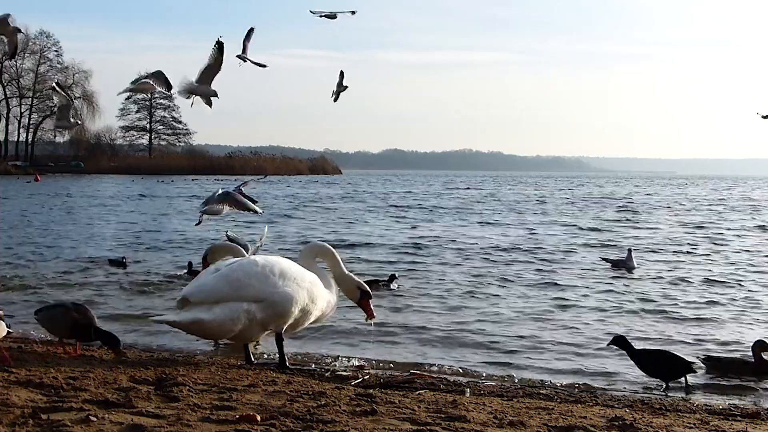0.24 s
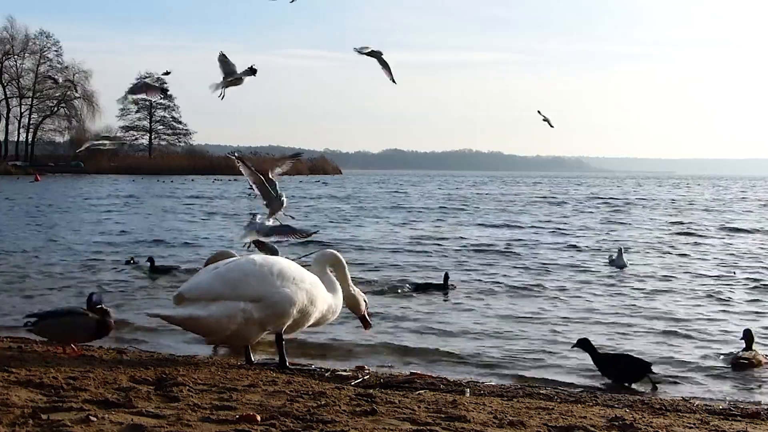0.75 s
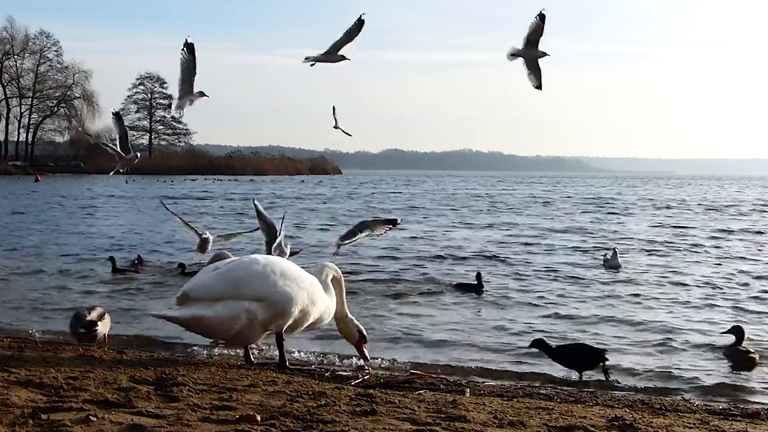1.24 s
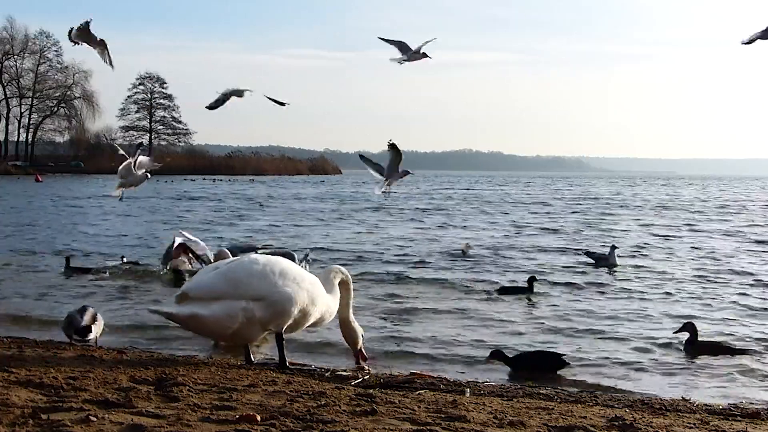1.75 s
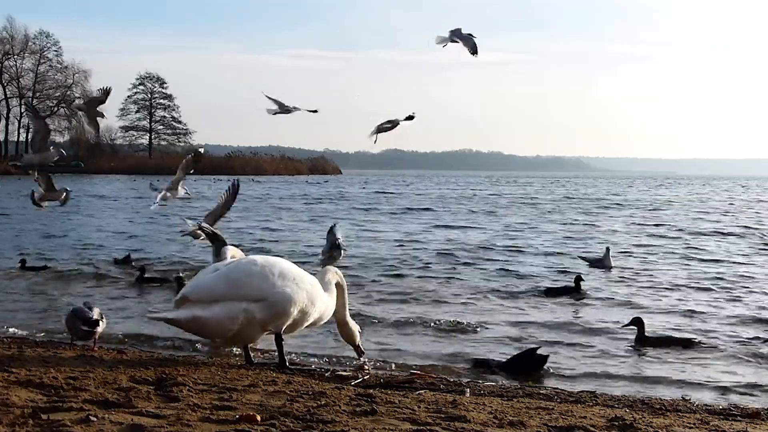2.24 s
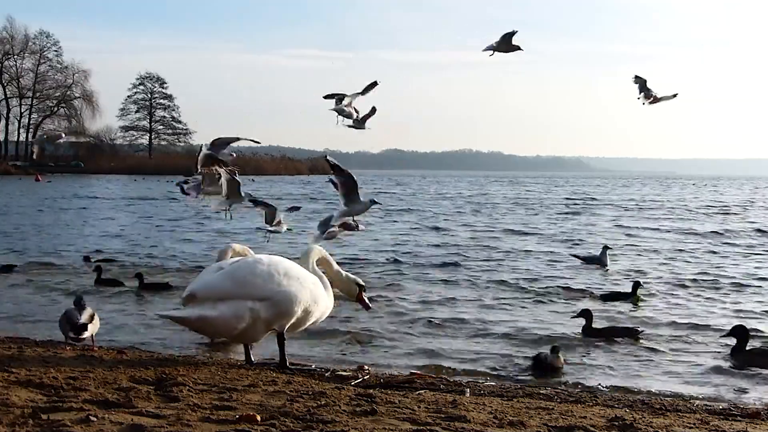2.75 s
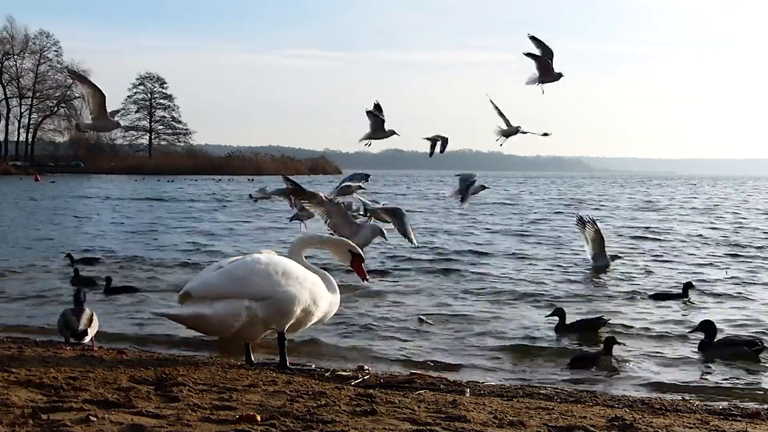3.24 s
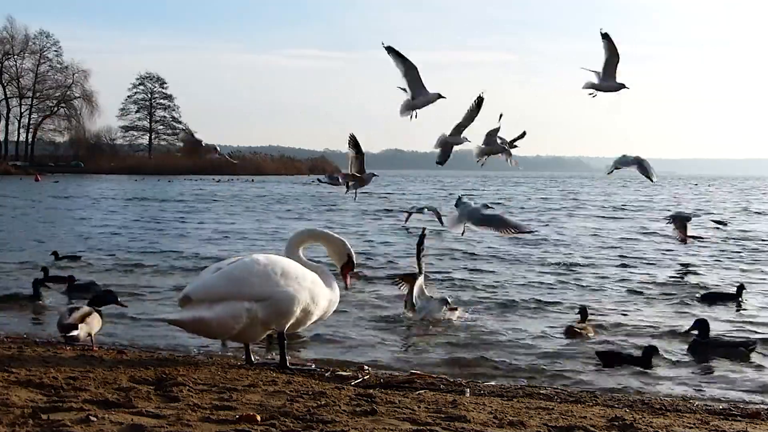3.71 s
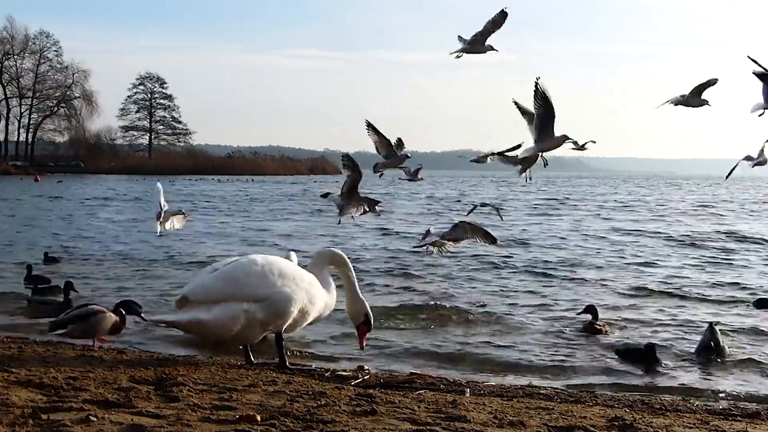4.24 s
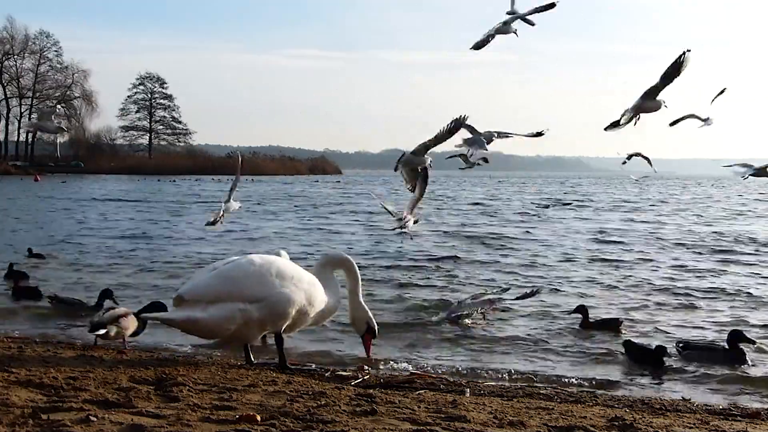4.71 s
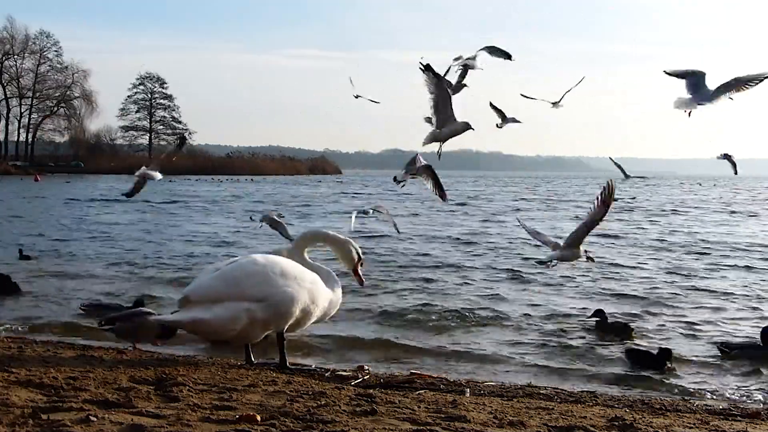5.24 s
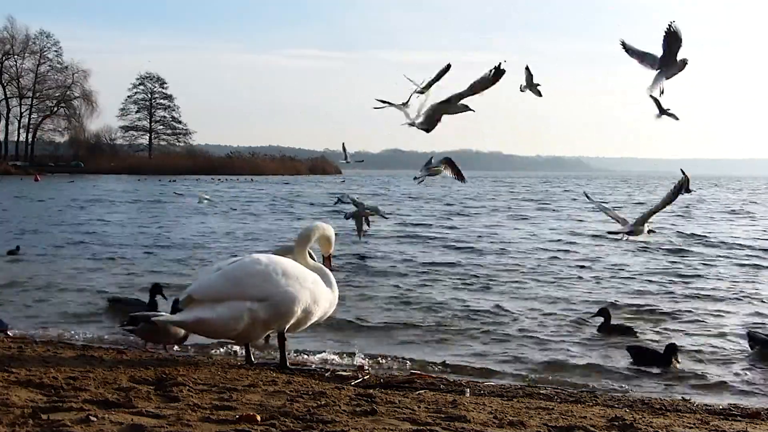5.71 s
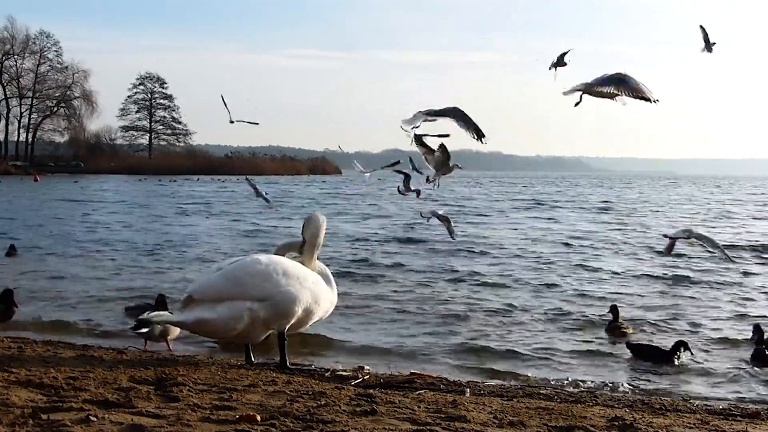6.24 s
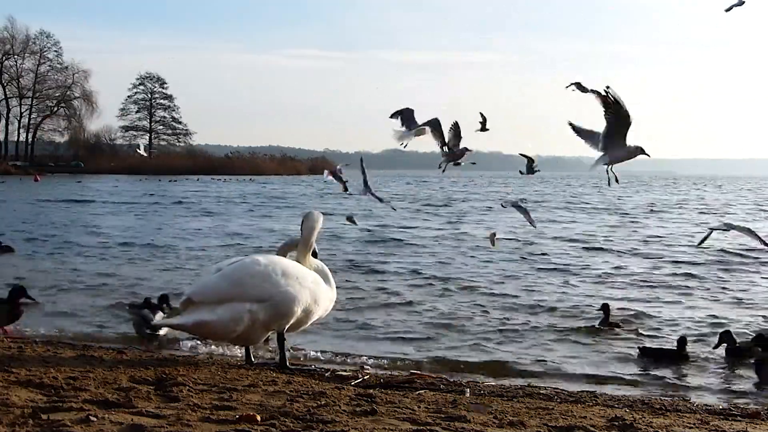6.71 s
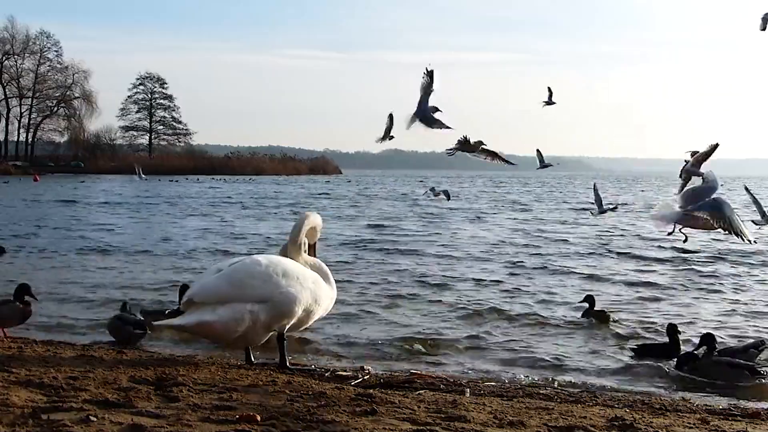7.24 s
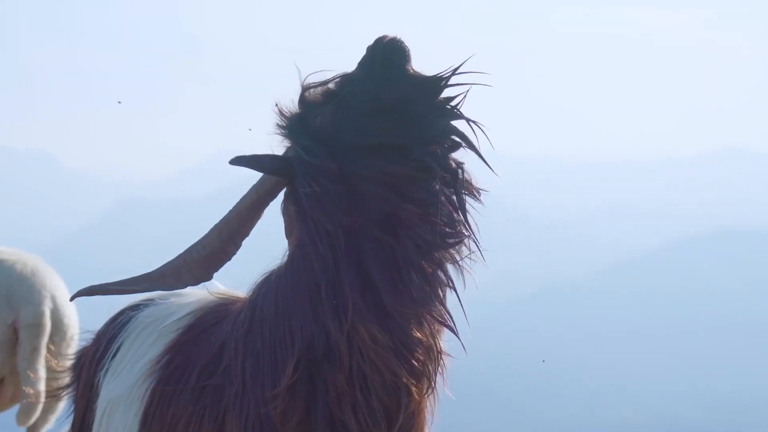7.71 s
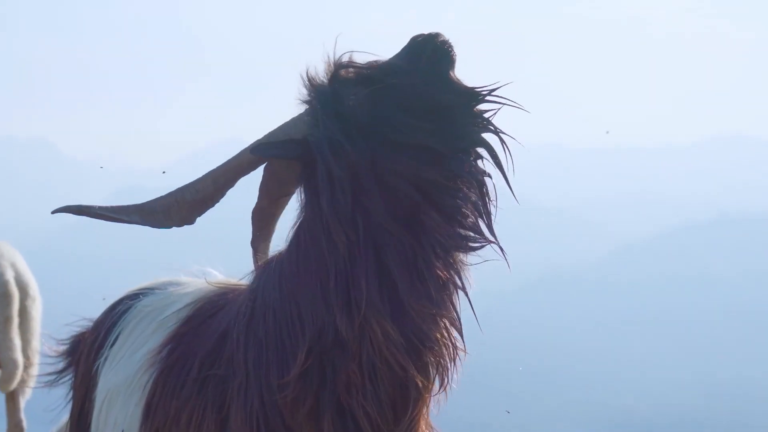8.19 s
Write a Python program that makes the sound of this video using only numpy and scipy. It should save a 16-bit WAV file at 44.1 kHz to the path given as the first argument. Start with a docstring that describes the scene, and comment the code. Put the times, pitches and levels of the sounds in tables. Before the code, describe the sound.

A flock of gulls squabbles in shrill overlapping yelps at a lakeshore, cuts off abruptly, then a goat gives one loud throbbing bleat.

```python
"""A water bird's pip, a sine, opens a lakeshore scene as a small wave of shaped noise runs up the sand.
Gulls squabble: shrill overlapping whistles, many breaking from a low register upward and snapping down
at the end, with partials added and a rasp of noise around them. The birds stop abruptly, then a goat gives
one loud bleat, a harmonic series over husky noise that throbs eleven times a second.
A faint rumble underlies the birds; a lopsided microphone distorts everything slightly."""
import sys
import numpy as np
from scipy import signal
from scipy.fft import rfft, irfft, next_fast_len
from scipy.io import wavfile
from scipy.ndimage import uniform_filter1d, minimum_filter1d, map_coordinates

SR = 44100
rng = np.random.default_rng(int(sys.argv[2]) if len(sys.argv) > 2 else 0)


def waveform_to_disk(signal):
    """Save audio, clipped to [-1, 1], as 16-bit WAV at the path in sys.argv[1]."""
    frames = np.transpose(np.atleast_2d(signal))
    scaled = np.clip(frames, -1, 1) * 32767
    samples = np.round(scaled).astype(np.int16)
    wavfile.write(sys.argv[1], SR, samples)


N = 373130
TIME = np.arange(N) / SR  # s
PIP_START, PIP_END, GULLS_END = .153, .182, 7.337  # s


def amp(db):
    """The logarithmic level scale: decibels to amplitude gain."""
    return 10 ** (np.asarray(db) / 20)


def unit(x):
    """Power normalisation: scale to rms 1."""
    return x / np.sqrt(np.mean(x ** 2) + 1e-20)


def along(points, hz):
    """Interpolate (frequency [Hz], value) points on a logarithmic frequency axis."""
    f, v = np.transpose(points)
    return np.interp(np.log(hz + 1), np.log(f + 1), v)


def curves(rows, t):
    """Piecewise-linear envelopes: each column after the first, read at the times t."""
    s, *cols = np.transpose(rows)
    return [np.interp(t, np.sort(s), c) for c in cols]


def wobble(rate, t):
    """Slow random modulation: a smooth curve over the times t with `rate` knots a second."""
    knots = (t - t[0]) * rate
    size = int(knots[-1]) + 4
    grid = np.arange(0, size, .2)
    smooth = map_coordinates(rng.standard_normal(size), [grid])
    return np.interp(knots, grid, smooth)


def gate(t, start, end, edge):
    """A trapezoidal envelope: 1 between start and end, with sloping edges."""
    return np.clip(np.minimum(t - start, end - t) / edge + .5, 0, 1)


def during(start, end):
    """The sample times of one call."""
    return TIME[(TIME >= start) & (TIME < end)]


def filtered(x, response):
    """Linear filtering: multiply the spectrum of x by a response of frequency."""
    size = next_fast_len(N + 8192)
    return irfft(rfft(x, size) * response(np.fft.rfftfreq(size, 1 / SR)), size)[..., :N]


def noise(spectrum):
    """Coloured noise of rms 1: white noise shaped by a spectral density."""
    return unit(filtered(rng.standard_normal(N), lambda hz: amp(along(spectrum, hz))))


def echoes(x, decay, delay):
    """Diffuse reverberation: a stereo noise tail in which each frequency has its own decay time."""
    hz, t, z = signal.stft(rng.standard_normal((2, SR // 2)), SR, nperseg=256)
    decay_db = -60 * t / along(decay, hz)[:, None]
    tail = signal.istft(z * amp(decay_db), SR, nperseg=256)[1]
    tail = np.pad(tail / np.linalg.norm(tail[0]), ((0, 0), (int(abs(delay) * SR), 0)))
    return signal.fftconvolve(x[None], tail, axes=1)[:, :N]


def gulls(voice_db=-1, side_db=-8.0, wet_db=-15):
    """Superposition: cries add as pressures, their incoherent air adds as power, and the shore answers."""
    # yelps that climb in the low register and break into the high one: (start [s], break [s], end [s],
    # opening [Hz], before the break [Hz], crest [Hz], closing [Hz],
    # low level [dB], high level [dB], closing level [dB], hoarseness [0-1])
    yelp_rows = [ (0.791, 0.839, 1.1, 3020, 3150, 3700, 3564, -31.5, -27.5, -25.5, 0.3),
                 (1.172, 1.24, 1.357, 2835, 3033, 3740, 3710, -25, -27.5, -28, 0.2),
                 (1.501, 1.557, 1.775, 2712, 3108, 3857, 3827, -28, -23.5, -27.5, .28),
                 (1.98, 2.048, 2.39, 2732, 3000, 3883, 3780, -26, -26, -29, .25),
                 (2.17, 2.258, 2.503, 2717, 2988, 3800, 3537, -26.5, -23.5, -22.5, .25),
                 (2.66, 2.746, 2.99, 2770, 2985, 3713, 3544, -29.5, -23.5, -28, 0.3),
                 (2.947, 3.041, 3.39, 2862, 3120, 3601, 3442, -25, -23, -24, .25),
                 (3.09, 3.135, 3.53, 2763, 3080, 3626, 3600, -27, -25, -27.5, 0.29),
                 (3.479, 3.536, 3.803, 2716, 2864, 3732, 3600, -23.5, -24, -26.5, 0.3),
                 (3.591, 3.641, 4.03, 2781, 3043, 3642, 3736, -28.5, -28.5, -27.5, .25),
                 (3.813, 3.865, 4.218, 2702, 2913, 3809, 3823, -24.5, -29, -27.5, 0.33),
                 (3.869, 3.914, 4.18, 3020, 3300, 3712, 3490, -21.5, -28, -27.5, 0.3),
                 (4.358, 4.397, 4.845, 3180, 3428, 3870, 3727, -29, -40.5, -24, 0.31),
                 (4.485, 4.571, 4.8, 2798, 3310, 3764, 3704, -32, -23, -25, .45),
                 (5.107, 5.155, 5.32, 3386, 3380, 3805, 3720, -25.5, -32, -58.5, 0.31),
                 (5.367, 5.417, 5.8, 2946, 3150, 3748, 3690, -33, -25.5, -25, .22),
                 (5.44, 5.528, 5.875, 3027, 3300, 3730, 3538, -27, -29, -25.5, .25),
                 (5.852, 6.012, 6.256, 2838, 3230, 3680, 3674, -30, -33, -23, .25),
                 (6.1, 6.168, 6.37, 2920, 3283, 3663, 3500, -27, -26.5, -30, 0.4),
                 (6.44, 6.514, 6.8, 3088, 3268, 3717, 3664, -24, -22.5, -23, 0.24),
                 (6.78, 6.892, 7.087, 3170, 3240, 3795, 3610, -31, -26.5, -31, 0.23),
                 (6.903, 6.953, 7.125, 3236, 3320, 3722, 3777, -23.5, -29, -27.5, 0.1),
                 (6.885, 7.005, 7.285, 2830, 3215, 3755, 3694, -28, -29.5, -26, 0.2)]
    # cries in one register: (start [s], end [s], opening [Hz], crest [Hz], closing [Hz], final fall [Hz],
    # opening level [dB], crest level [dB], closing level [dB], hoarseness [0-1], brightness [dB])
    cry_rows = [ (.265, 0.376, 2750, 3154, 2810, -12, -36, -38.5, -30, 0.25, -16.5),
                (.59, 0.804, 3395, 3690, 3654, 995, -30.5, -21.5, -31.5, 0.4, -5.5),
                (.6, 0.811, 2716, 2958, 3006, 395, -29, -31.5, -29.5, 0.4, -1.5),
                (.76, .88, 3750, 3734, 3260, 797, -42, -30.5, -26, 0.37, -8.5),
                (.937, 1.312, 2852, 3070, 3017, 648, -32, -25.5, -25.5, 0.54, -4),
                (1.14, 1.513, 3600, 3684, 3527, -0.5, -30.5, -28, -23.5, .3, -10.5),
                (1.26, 1.464, 3046, 3070, 3033, 701, -22.5, -27.5, -27.5, 0.37, -0.5),
                (1.485, 1.678, 3672, 4010, 3720, 1401, -29.5, -26.5, -30, 0.25, -1.5),
                (1.5, 1.738, 3028, 3197, 2967, 1, -26, -25.5, -25, 0.27, 0.5),
                (1.73, 1.906, 2950, 3215, 3290, 1048, -17.5, -22.5, -26, 0.3, -5),
                (1.76, 1.905, 3790, 4016, 3826, 1098, -23, -28, -25.5, .22, 1.5),
                (1.76, 2.002, 3073, 3273, 2935, 6, -27.5, -23, -22, 0.3, 1),
                (1.98, 2.312, 2894, 3066, 2918, 344.5, -25, -22.5, -26.5, 0.3, 6),
                (2.17, 2.338, 3122, 3131, 3290, -4, -19, -26.5, -30, 0.16, -14),
                (2.315, 2.492, 3780, 3872, 3530, 491, -17.5, -25, -30, 0.27, 5),
                (2.43, 2.526, 2990, 2877, 2936, 2, -26, -27, -24.5, 0.23, 0.5),
                (2.5, 2.595, 2935, 3040, 3005, 497, -30, -30.5, -25, 0.37, 0.5),
                (2.58, 2.7, 3120, 3220, 3064, 10.5, -32, -28, -23, 0.46, 4.5),
                (2.535, 2.88, 3580, 4108, 3960, 1489, -27.5, -23.5, -26, 0.29, 1.5),
                (2.68, 2.821, 3038, 3008, 2987, 645, -31.5, -22.5, -26.5, 0.36, 0),
                (2.8, 3.194, 2887, 2884, 2773, 245, -36, -33, -28.5, 0.27, 9),
                (2.98, 3.099, 2909, 3028, 2915, 661, -31, -28, -32, 0.22, 2),
                (3.108, 3.192, 2310, 2180, 2093, 1, -48.5, -37.5, -42.5, 0.6, -9.5),
                (3.115, 3.198, 4180, 4400, 3810, 1206, -40.5, -24.5, -31.5, .8, 0),
                (3.19, 3.305, 2813, 2968, 2950, 443, -24, -26, -24, 0.37, -1.5),
                (3.3, 3.762, 2968, 2991, 3052, 245, -27.5, -24.5, -23, 0.28, 0.5),
                (3.645, 3.752, 4114, 4117, 4070, 0, -25, -21.5, -34.5, 0.23, -3),
                (3.69, 4.214, 2714, 2905, 2783, 403, -32.5, -42, -36, 0.3, 13.5),
                (4.313, 4.363, 3020, 3000, 3060, -18, -64, -54, -50.5, 0.3, 11.5),
                (4.6, 4.912, 3028, 3100, 2998, 450, -25.5, -23, -26.5, 0.5, 1.5),
                (4.62, 4.693, 3285, 3305, 3380, 0, -20.5, -27, -22, 0, -11),
                (4.78, 4.928, 3188, 3190, 3060, -1.5, -33.5, -25, -26, 0.7, -2),
                (4.918, 5.019, 3187, 3224, 3050, 0, -30, -24, -28.5, 0.67, 0),
                (5.012, 5.113, 3070, 3118, 3124, 394, -30, -24, -23, 0.33, 0.5),
                (5.29, 5.327, 3480, 3570, 3560, 899, -44, -26.5, -35.5, 0.16, 7.5),
                (5.395, 5.688, 2947, 2993, 2940, 692, -25.5, -28, -29, 0.32, 0),
                (5.752, 5.948, 2830, 2983, 2910, 495, -27, -21, -29, 0.4, -0.5),
                (5.885, 6.448, 3602, 3756, 3580, 1199, -29, -33, -28.5, 0.33, -1),
                (6.313, 6.453, 3053, 3116, 3260, 497, -23.5, -25, -23, 0.19, -3),
                (6.395, 6.495, 2768, 2965, 3105, -3, -23, -21.5, -26, 0.37, 0.5),
                (6.48, 6.817, 3066, 3020, 3070, 751.5, -23.5, -24, -24.5, 0.3, 2),
                (7.32, 7.341, 2805, 2775, 2870, 0, -47, -43, -39.5, 0.24, 5)]
    # hoarse gliding squeals: (start [s], end [s], opening [Hz], closing [Hz],
    # opening level [dB], closing level [dB])
    squeal_rows = [(0.381, 0.465, 3400, 6430, -41, -70), (0.513, 0.582, 5600, 3420, -38, -35.5),
                   (0.518, 0.533, 7400, 4570, -35, -34), (0.543, 0.602, 3900, 2660, -41, -34.5)]
    # spectrum of the air around the cries: (frequency [Hz], density [dB per Hz])
    air_spectrum = [(60, -25.5), (200, -18), (450, -8), (1000, -6), (2000, 0), (2500, 6.5), (3100, 3),
                    (4200, 2.5), (5200, 6.5), (6200, 5), (7400, -22.5), (8200, -14), (9200, -33)]
    # reverberation of the shore: (frequency [Hz], time to fall 60 dB [s])
    shore_decay = [(300, .18), (3500, .22), (8000, .16)]
    dip_s, dip_width_s, dip_db = 3.931, .009, 22  # the level of the flock dips briefly

    calls = [yelp(*row) for row in yelp_rows]
    calls += [plain_cry(*row) for row in cry_rows]
    calls += [squeal(*row) for row in squeal_rows]
    voices, air_power = np.zeros((2, N))
    for t, tone, power in calls:
        at = np.rint(t * SR).astype(int)
        voices[at] += tone
        air_power[at] += power
    voices = filtered(voices, lambda hz: 1 / np.sqrt(1 + (hz / 7600) ** 40))  # steep low-pass
    air = noise(air_spectrum) * np.sqrt(air_power) * amp(2.5 * wobble(120, TIME))
    dip = amp(-dip_db * np.exp(-((TIME - dip_s) / dip_width_s) ** 2))
    flock = (amp(voice_db) * voices + air) * dip
    return widen(flock, side_db) + amp(wet_db) * echoes(flock, shore_decay, delay=.004)


def yelp(start, jump, end, opening_hz, climbed_hz, crest_hz, closing_hz, low_db, high_db, closing_db, hoarse):
    """A register break: a climb in the low register, a sudden jump upward, a held note and its fall."""
    climb_power, climb_db = 1.3, 5  # pitch and strength gather towards the break
    break_s, scoop_hz = .01, 119.6  # the jump takes this long and lands this far under the crest
    t = during(start, end)
    climb = np.clip((t - start) / (jump - start), 0, 1)
    pitches = (crest_hz - scoop_hz, crest_hz, closing_hz)
    hz, db, fall = arch(t, jump, end, pitches, (high_db, high_db, closing_db), fall_hz=1397)
    low = np.clip((jump - t) / break_s + .5, 0, 1)
    low_hz = opening_hz + (climbed_hz - opening_hz) * climb ** climb_power
    hz = hz + low * (low_hz - hz)
    db = db + low * (low_db + climb_db * (climb - .5) - db)
    return membrane(t, hz, db, hoarse, slack=fall, bright_db=-1.2)


def plain_cry(start, end, opening_hz, crest_hz, closing_hz, fall_hz,
              opening_db, crest_db, closing_db, hoarse, bright_db):
    """Frequency modulation without a break: one arched note in a single register."""
    t = during(start, end)
    pitches, levels = (opening_hz, crest_hz, closing_hz), (opening_db, crest_db, closing_db)
    hz, db, fall = arch(t, start, end, pitches, levels, fall_hz)
    return membrane(t, hz, db, hoarse, slack=fall, bright_db=bright_db)


def squeal(start, end, opening_hz, closing_hz, opening_db, closing_db):
    """A rough frequency glide, fastest at first, that opens with a puff of air."""
    t = during(start, end)
    u = np.linspace(0, 1, len(t)) ** .42
    hz = opening_hz + (closing_hz - opening_hz) * u
    db = opening_db + (closing_db - opening_db) * u
    return membrane(t, hz, db, hoarse=.49, slack=.53 * (1 - u) ** 2, bright_db=0.5)


def arch(t, start, end, pitches, levels, fall_hz):
    """Tension sets pitch: it arches over a crest, then a slack membrane plunges. Gives Hz, dB, fall 0-1."""
    crest_at, power = .42, 1.9  # where the held note peaks, and how flat its top is
    fall_s, fall_db = .028, 11
    opening, crest, closing = pitches
    u = np.clip((t - start) / max(end - fall_s - start, 1e-3), 0, 1)
    before = np.maximum(1 - u / crest_at, 0)
    after = np.maximum(u - crest_at, 0) / (1 - crest_at)
    fall = np.clip((t - end) / fall_s + 1, 0, 1) * (fall_hz > 0)  # only a positive fall counts
    hz = crest + (opening - crest) * before ** power + (closing - crest) * after ** power
    hz = hz - fall_hz * fall ** 1.6
    return hz, np.interp(u, [0, crest_at, 1], levels) - fall_db * fall ** 2, fall


def membrane(t, hz, db, hoarse, slack=0, bright_db=0, break_hz=3420, screech_db=6, grit=1.0):
    """Period doubling: a whistle with partials halfway between its harmonics. Gives times, tone, air power."""
    # partials, strongest in the low register: (multiple of the pitch, low-register level [dB],
    # high-register level [dB])
    partials = [(.5, -44, -54), (1.5, -18.5, -38.5), (2, -16, -27.5), (2.5, -40, -65.5)]
    jitter, shimmer_db, attack_s = .024, 5.5, .004
    flutter_hz, flutter_share = 74.4, .027  # trill rate; share of the pitch per unit of hoarseness
    rasp_db, rasp_hoarse_db, rasp_fall_db = -29.5, 12, 7  # air: plain, added by hoarseness, by slackness

    # hoarseness comes and goes within a cry and grows as the membrane slackens
    hoarse = np.clip(hoarse * amp(1.61 * wobble(14, t)) + .34 * slack, 0, .9)
    hoarse = hoarse * np.minimum(1, hoarse / .27)  # below .27 it settles into a clean whistle
    high = np.clip((hz - break_hz) / 200 + .5, 0, 1)
    # an uneven trill shakes pitch and strength; faster strain adds jitter and shimmer
    trill = flutter_share * hoarse * np.sin(2 * np.pi * flutter_hz * t + 2 * wobble(35, t))
    hz = hz * (1 + trill + jitter * hoarse * wobble(650, t))
    phase = 2 * np.pi * np.cumsum(hz) / SR + rng.uniform(0, 2 * np.pi)
    tone = np.sin(phase)
    for k, low_db, high_db in partials:
        # under strain the other partials swell and smear into a screech
        partial_db = low_db + high * (high_db - low_db) + bright_db + screech_db * hoarse
        partial_db = partial_db + 3 * wobble(32.4, t)
        tone += amp(partial_db) * np.sin(k * phase + grit * hoarse * wobble(1700, t))
    edges = np.clip(np.minimum(t - t[0], t[-1] - t) / attack_s, 0, 1)
    shimmer = shimmer_db * hoarse * wobble(250, t) + .8 * wobble(22.26, t)
    size = edges * amp(db + shimmer) * (1 + 10 * trill)
    air = size * amp(rasp_db + rasp_hoarse_db * hoarse + rasp_fall_db * slack)
    return t, np.sqrt(2) * tone * size, air ** 2


def goat(voice_db=-3, husk_db=-10, smear=0.36):
    """Source and filter: throbbing folds drive a throat; each throb swells, then collapses into a rattle."""
    # one throb: (time from its top [rise times], share of the top pitch, level [dB], roughness [0-1],
    # extra fundamental level [dB])
    throb = [(-1.1, .83, -45, .6, -15), (-.85, .84, -15, .6, -18), (-.55, .9, -4.5, .22, -12),
             (-.25, .945, -1, .12, -2), (0, 1, 0, .15, 0), (.2, .975, -1.5, .5, -1), (.42, .86, -9, .9, -6),
             (.65, .8, -21, .9, -12), (1.1, .78, -45, .9, -14)]
    # course of the bleat: (time [s], rise of a throb [s], top pitch [Hz], level [dB],
    # mouth opening [factor on the resonances])
    bleat_course = [(7.672, .015, 410, -53, .8), (7.762, .028, 440, -16.5, .87),
                    (7.853, .046, 447, -10.5, .98), (7.943, .054, 458, -11.7, 1),
                    (8.215, .05, 482, -12.7, 1.02), (8.486, .046, 483, -19, 1.02)]
    # resonances of throat and mouth: (frequency [Hz], level [dB])
    throat = [(200, -25), (450, -4), (880, -2), (1270, -18), (1470, -7), (1800, -4), (2130, 0), (2500, -15),
              (2850, -4), (3130, -2), (3350, -5), (3850, -3), (4400, -17), (5200, -27), (7300, -35),
              (9000, -56)]
    # turbulent air of the bleat: (frequency [Hz], density [dB per Hz])
    husk_spectrum = [(40, -25), (130, 2.5), (300, -1), (800, -17), (1200, 6.5), (2000, -4.5), (3200, -2.5),
                     (4000, -0.5), (5000, -6), (7300, -30), (8800, -39.5), (15000, -45)]
    # reverberation of the hillside: (frequency [Hz], time to fall 60 dB [s])
    hillside_decay = [(200, 0.82), (2500, 0.84), (8000, 0.074)]
    first_throb_s, throb_every_s = 7.6715, .0905
    jitter, waver_db, wet_db = .045, 2.3, -13
    focus_hz, slide_hz, width_hz, focus_db = 3050, 700, 300, 6

    voice, push, cycle = np.zeros((3, N))
    for top in np.arange(first_throb_s, TIME[-1] + throb_every_s / 2, throb_every_s):
        rise, top_hz, level_db, mouth = curves(bleat_course, top)
        span = (TIME > top + throb[0][0] * rise) & (TIME < top + throb[-1][0] * rise)
        t = TIME[span]
        share, db, rough, chest_db = curves(throb, (t - top) / rise)
        hz = top_hz * share * (1 + jitter * rough * wobble(600, t))
        phase = 2 * np.pi * np.cumsum(hz) / SR
        strength = amp(level_db + db + 2 * rough * wobble(400, t))
        # a sharp upper resonance slides down through each throb while the pitch rises to meet it
        focus = focus_hz - slide_hz * (t - top) / rise
        for k in range(1, 20):
            partial_hz = k * top_hz * share / mouth
            ring_db = focus_db / (1 + ((partial_hz - focus) / width_hz) ** 2)
            throat_db = ring_db + along(throat, partial_hz) + (k == 1) * chest_db + waver_db * wobble(60, t)
            # the throat delays each harmonic differently and so smears the pulses of the folds
            partial_phase = k * phase + smear * k * k + rough * wobble(252.8, t)
            voice[span] += strength * amp(throat_db) * np.sin(partial_phase)
        push[span] += strength * np.sqrt(np.abs(rough))
        cycle[span] = phase
    husk = push * (1 + 0.89 * np.cos(cycle)) * noise(husk_spectrum)  # air pulses once per fold cycle
    bleat = amp(voice_db) * voice + amp(husk_db) * husk
    return widen(bleat, side_db=-17) + amp(wet_db) * echoes(bleat, hillside_decay, delay=0.014)


def pip(hz=820, db=-45):
    """Simple harmonic motion: a water bird's short, nearly pure note."""
    return amp(db) * gate(TIME, PIP_START, PIP_END, edge=0.0019) * np.sin(2 * np.pi * hz * TIME)


def hush(wash_db=4, rumble_db=-78, stir_db=2):
    """Broadband turbulence: a small wave runs up the sand; a very faint rumble lies under the birds."""
    # swell of the wave, before the gain wash_db: (time [s], level [dB])
    wash = [(0.157, -65), (0.167, -51), (0.205, -57.5), (0.381, -49.5), (0.429, -72), (0.51, -72.5)]
    # spectrum of the wave: (frequency [Hz], density [dB per Hz])
    surf_spectrum = [(60, -11), (170, -5), (300, -11), (800, -5), (2500, 5), (4000, 2.5), (5200, -20),
                     (7000, -16.5), (9000, -29.5), (11000, -42)]
    # (frequency [Hz], density [dB per Hz])
    rumble_spectrum = [(20, 9.5), (80, -3), (200, -21.5), (1000, -31.0), (8000, -79.5)]
    wave_db, = curves(wash, TIME)
    rumble = amp(rumble_db + stir_db * wobble(4, TIME)) * noise(rumble_spectrum)
    wave = amp(wave_db + wash_db) * noise(surf_spectrum)
    return widen(rumble + wave, side_db=-5.5) * gate(TIME, PIP_START, GULLS_END, edge=0.0041)


def widen(x, side_db, lead_hz=3050, spacing_hz=1400, scatter_db=-3):
    """Interference: a ground reflection makes left and right lead in turn along frequency; scatter blurs it."""
    # quick scatter off the ground: (frequency [Hz], time to fall 60 dB [s])
    bank_decay = [(500, .05), (6000, 0.12)]
    # the factor 1j turns each component by a quarter cycle
    lead = filtered(x, lambda hz: 1j * np.cos(2 * np.pi * (hz - lead_hz) / spacing_hz))
    side = amp(side_db) * (lead + amp(scatter_db) * echoes(x, bank_decay, delay=0)[0])
    return np.array([x + side, x - side])


def limited(x):
    """Gain reduction: a fast limiter flattens the loudest throbs, both channels alike."""
    ceiling = .64  # of full scale
    needed = np.minimum(1, ceiling / (np.abs(x).max(0) + 1e-9))
    return x * uniform_filter1d(minimum_filter1d(needed, size=300), size=200)


def scene():
    """Superposition of the sources: the lakeshore, which stops abruptly, then the goat."""
    shore = (gulls() + pip() + hush()) * gate(TIME, 0, GULLS_END, edge=.005)
    return shore + goat()


def record(dry, bend=0.21):
    """Quadratic distortion: a lopsided microphone adds faint sum and difference tones of paired whistles."""
    # response to the squared signal: (frequency [Hz], level [dB])
    bend_response = [(30, -54), (150, -22.5), (550, 3.5), (7000, -0.5), (8500, -20.5), (10000, -43.5)]
    overtones = filtered(dry ** 2, lambda hz: amp(along(bend_response, hz)))
    return filtered(limited(dry + bend * overtones), lambda hz: hz < 15700)  # nothing above this passes


dry = scene()
out = record(dry)
waveform_to_disk(out)
```